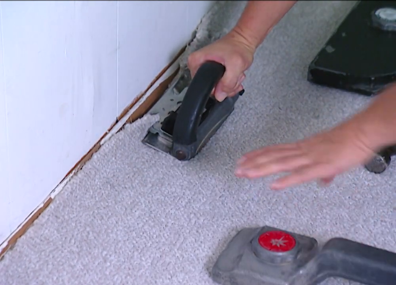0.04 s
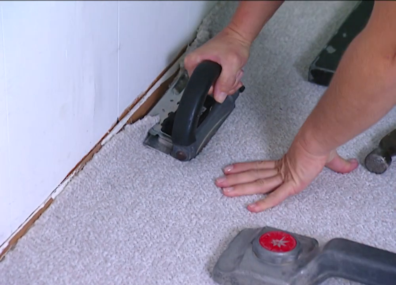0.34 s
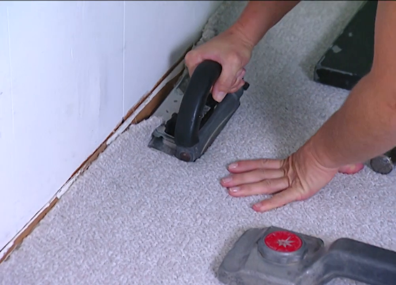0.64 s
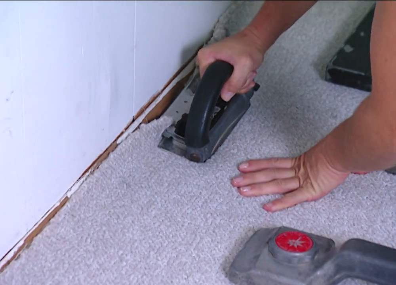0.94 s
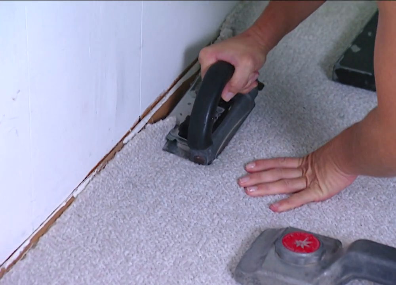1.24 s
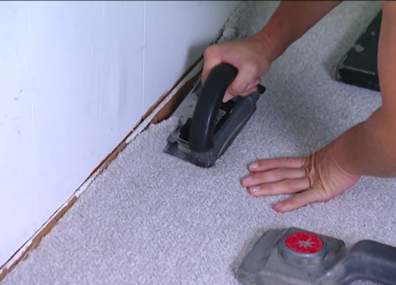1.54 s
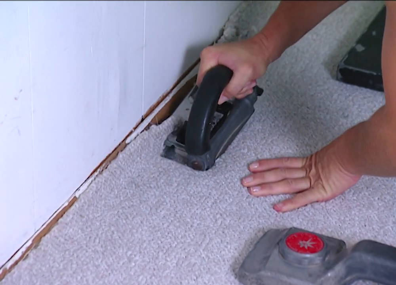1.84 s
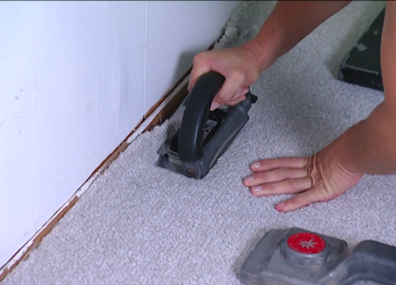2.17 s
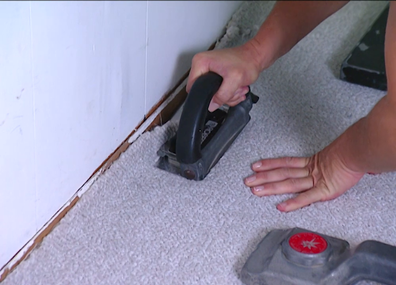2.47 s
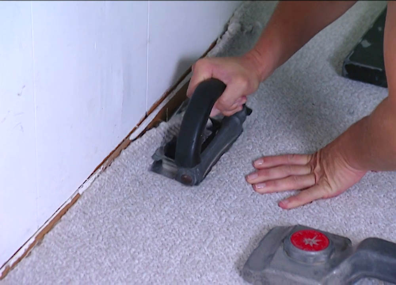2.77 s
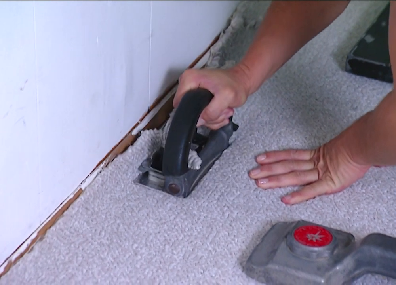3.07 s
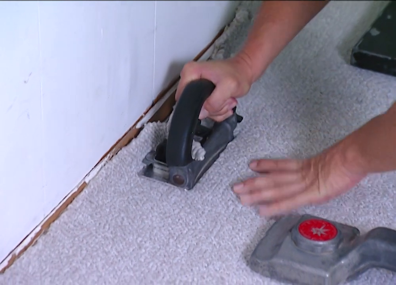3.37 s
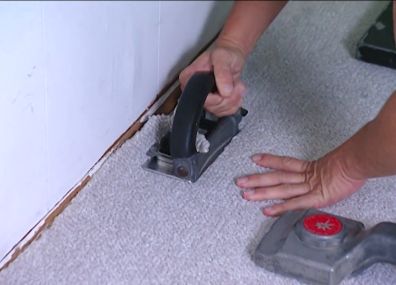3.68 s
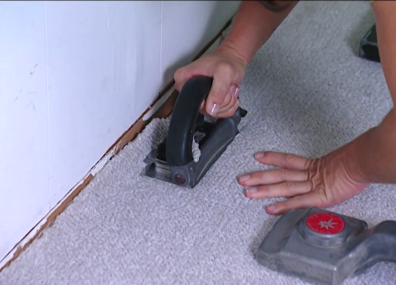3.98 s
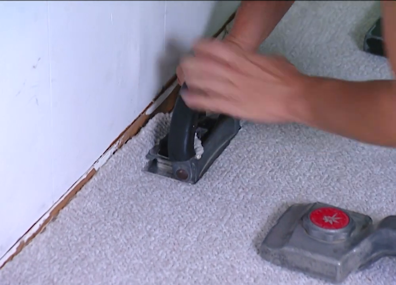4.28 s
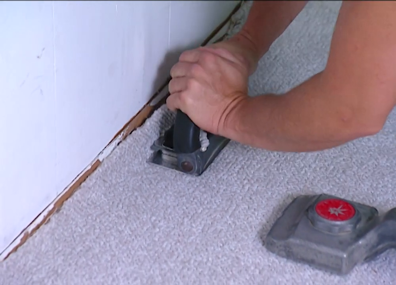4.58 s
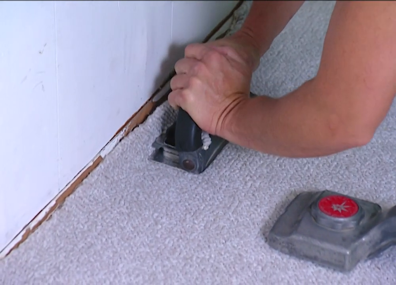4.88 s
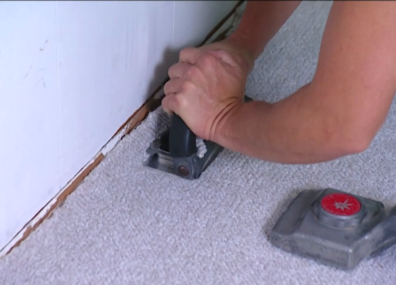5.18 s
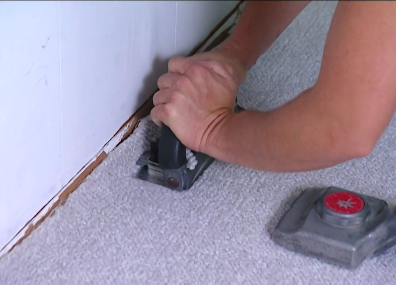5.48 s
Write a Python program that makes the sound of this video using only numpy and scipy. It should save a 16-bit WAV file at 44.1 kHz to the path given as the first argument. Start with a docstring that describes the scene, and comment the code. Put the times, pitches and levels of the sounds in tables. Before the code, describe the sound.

A hand trimmer cuts through carpet in uneven strokes, with dry tearing, crackling threads and a few light knocks in a quiet room.

```python
"""Trimming carpet along a baseboard

A hand trimmer is pushed in uneven strokes through carpet in a quiet room. Its blade tears a mass of
fine fibres and snaps the stiff threads of the backing one by one; each fracture is an impulse that
excites the tool's resonances. Between strokes hand and sole rub over the pile, and the tool knocks
as the grip changes."""
import sys
import numpy as np
from scipy import signal
from scipy.fft import rfft, irfft
from scipy.io import wavfile
from scipy.ndimage import uniform_filter1d, map_coordinates

SR = 44100
rng = np.random.default_rng(int(sys.argv[2]) if len(sys.argv) > 2 else 0)


def digitize_waveform(pressure):
    """Quantize a signal to 16-bit integers and store it at the path in sys.argv[1].

    Rows of a 2-D input are taken as channels; values are limited to [-1, 1].
    """
    field = np.atleast_2d(pressure).T
    bounded = np.clip(field, -1, 1)
    quanta = np.round(bounded * 32767).astype(np.int16)
    wavfile.write(sys.argv[1], SR, quanta)


N = 252252

# spectra of the room tone and of the pile's swish (frequency [Hz], relative density [dB])
ROOM_SPECTRUM = [(20, -16), (55, 6.5), (110, -3), (160, -6.5), (215, -2), (320, -20), (600, -15),
                 (1200, -25), (2500, -24), (5000, -26), (9000, -28), (16000, -33.5)]
PILE_SPECTRUM = [(100, -8), (220, -3), (350, 4), (700, 4), (1150, -3), (1800, -5.5), (3000, -7), (5500, -8),
                 (11000, -14), (16000, -17.5)]
# swell of a distant drone (time [s], level [dB])
DRONE_SWELL = [(0.5, -65), (0.7, -57), (1.25, -58), (1.45, -61.5)]
# bands of rasp, treble and body (lower edge [Hz], upper edge [Hz])
# a level below is that of the rasp; treble and body are relative to it
REGISTER_BANDS = [(1500, 4800), (4800, 16000), (70, 1400)]
# hand and sole brushing the pile
# (time at full speed [s], attack [s], hold [s], release [s], relative level [dB], treble [dB], body [dB])
RUB_GESTURES = [(0.0, .1, 0.23, 0.11, -60, -0.5, 5.5), (0.41, 0.1, 0.039, 0.16, -63.5, 3, 3),
                (0.652, 0.41, 0.034, 0.29, -53, -2.5, 3.5), (0.95, 0.084, .15, 0.69, -63, 3, 3),
                (3.175, .18, 0.027, 0.39, -57, 2, 2), (3.396, 0.31, 0.086, 0.17, -61, 2, -2),
                (3.683, 0.094, 0.014, .08, -55.5, 0, -0.5), (4.067, 0.063, 0.0091, 0.081, -52, 0.5, 0),
                (4.19, .1, .02, 0.18, -80.5, 16, -5), (4.362, 0.069, .004, 0.02, -66, 6, 2),
                (4.414, 0.011, 0.0058, 0.012, -70.5, 16.5, -6), (4.679, 0.043, .02, 0.36, -57.5, -1, 5)]
# blows of tool and hand (time [s], unfiltered peak [dB], most excited frequency [Hz], T60 factor [1])
BLOWS = [(0.385, -32, 350, 0.63), (3.0247, -27, 725, 0.47), (3.263, -38, 450, .9), (3.291, -30, 434, 0.72),
         (4.096, -40.5, 440, 1.4), (4.254, -37, 3020, 0.6), (4.352, -38, 252, 1.1),
         (4.517, -34, 1490, 0.99), (4.620, -45, 450, 1.2), (4.656, -22, 990, 2), (4.6598, -21, 171, 1.5),
         (4.667, -27, 1210, 0.69)]
# modes of the tool on the padded floor (frequency [Hz], gain [dB], T60 [s])
FLOOR_MODES = [(138.8, -7.5, 0.026), (206, -6, 0.026), (435, -7, 0.046), (545, -12, 0.06),
               (864, 6.5, 0.012), (1160, 0, 0.0044), (1570, -8, 0.008), (2200, 1.5, 0.012),
               (3180, 2, 0.012)]
# resonances of tool and blade in four successive grips (frequency [Hz], width [Hz], gain [dB])
GRIP_1 = [(194, 130, 4), (437, 78, 3.5), (730, 190, 6.5), (1062, 235, 4), (1980, 130, -1),
          (2390, 600, -3.5), (3094, 460, -1.5), (3900, 1200, -6.5), (6160, 810, 1.5), (8230, 710, 2),
          (9130, 1000, 2), (10600, 700, -14), (11500, 820, 2), (12700, 630, -1), (14700, 760, -0.5),
          (14800, 700, -10)]
GRIP_2 = [(98, 167, 3.5), (453.8, 150, 3.5), (760, 220, 5.5), (1140, 190, -0.5), (2022, 108, -3),
          (2530, 290, -1.5), (3250, 580, -1), (3950, 920, -0.5), (6300, 950, 3), (8350, 830, -15),
          (9040, 1340, 4.5), (10800, 980, -2.5), (11800, 690, 4.5), (12250, 1400, -1), (14200, 650, -4),
          (15300, 650, -3)]
GRIP_3 = [(150, 490, -4), (748, 250, 10), (1050, 130, 2), (1940, 220, 3.5), (2726, 590, 3.5),
          (3960, 860, 1), (5190, 600, 1), (6260, 610, -2.5), (7530, 500, -5), (8650, 450, 1.5),
          (10400, 390, -0.5), (11600, 470, -4), (13200, 600, -6), (14700, 900, -4)]
GRIP_4 = [(174, 230, -1), (500, 380, 4), (817, 117, 8.5), (965, 194, 1.5), (2000, 184, 3), (2518, 340, 3.5),
          (3135, 300, 5), (3750, 400, -7.5), (5080, 420, -1), (6120, 650, -6.5), (8020, 1000, -6.5),
          (8560, 500, -5.5), (10340, 480, -5), (11240, 640, -9), (12600, 900, -11), (14520, 900, -8.5)]
# changes of grip (time [s])
GRIP_CHANGES = [2.4, 3.4, 4.4]
# strokes during which the blade creeps on between pushes (start [s], end [s], level [dB])
CREEP_STROKES = [(0.961, 1.725, -70), (1.719, 2.953, -68), (3.757, 4.024, -67.5), (4.85, 5.798, -75)]
# pushes that drive the blade (time at full force [s], attack [s], hold [s], level [dB], treble [dB])
BLADE_PUSHES = [(1.003, .04, 0.063, -55.5, -0.5), (1.244, .1, 0.012, -66, -4),
                (1.484, 0.069, 0.024, -44.5, 3.5), (1.57, 0.043, 0.023, -57, 4.5),
                (1.658, 0.064, 0.024, -47, -1.5), (1.972, 0.045, .073, -37.5, -1.5),
                (2.108, .04, 0.0089, -45.5, -2), (2.282, 0.24, 0.012, -61, -1),
                (2.488, 0.0068, 0.02, -46, -5.5), (2.607, 0.058, 0.051, -46.5, -12),
                (2.745, 0.23, .125, -33.5, 0), (3.786, 0.035, 0.039, -46.5, 7.5),
                (3.951, 0.039, 0.037, -53.5, 8), (4.874, 0.028, 0.036, -46.5, 9),
                (5.044, 0.085, 0.12, -50.5, 9.5), (5.212, 0.13, .19, -46.5, 8),
                (5.459, 0.11, 0.0081, -50.5, 7), (5.556, 0.054, 0.012, -50, 6),
                (5.629, 0.068, 0.079, -47.5, 7.5)]
# loudest snaps of backing threads, and sharp ticks of the tool as it knocks
# (time [s], level [dB], treble [dB])
SNAPS_AND_TICKS = [(0.3849, -44.5, -3.5), (0.6466, -48.5, 7.5), (0.7132, -53, 17), (0.724, -44.5, 2),
                   (0.9922, -50.5, 13.5), (1.0475, -41, 7.5), (1.1264, -45, 8), (1.1316, -42, 9),
                   (1.2113, -51, 11), (1.2233, -50.5, 9), (1.459, -36.5, 0), (1.4782, -43, 6),
                   (1.6417, -45.5, 7), (1.6465, -46, 10), (1.789, -49, 12.5), (1.961, -34.5, -1),
                   (1.9645, -35.5, -3), (2.0208, -33.5, 8), (2.038, -44, 14.5), (2.0593, -49, 5),
                   (2.0634, -40.5, 14), (2.0905, -41.5, 10), (2.1112, -48, 11), (2.115, -41.5, 10),
                   (2.2867, -54, 16), (2.392, -59.5, 13), (2.4814, -43.5, 7), (2.536, -51.5, 20.5),
                   (2.5715, -52.5, 19), (2.609, -42, 9), (2.6457, -36.5, 4), (2.6581, -36.5, 10.5),
                   (2.7828, -31.5, 6), (2.7898, -41, 12), (2.8156, -35, 10), (2.8337, -43, 12),
                   (2.853, -46, 4), (2.8758, -47, 7), (2.896, -32, 5), (2.9087, -28.5, 0.5),
                   (2.9554, -62, 20.5), (3.0245, -40.5, 1.5), (3.476, -51, -1), (3.7698, -34, 2.5),
                   (3.7954, -41, 10.5), (3.8091, -31, 4), (3.829, -36.5, 6), (3.8346, -31, 4.5),
                   (3.9466, -36.5, 7.5), (3.9767, -39.5, 4.5), (3.9894, -42, 7), (4.0082, -45.5, 5),
                   (4.7502, -42.5, 8), (4.8709, -35.5, 1), (4.8753, -37, 8.5), (4.9025, -41.5, 10),
                   (4.9231, -35.5, 4), (4.9355, -37.5, 8.5), (4.9774, -42.5, 9.5), (5.0227, -41, 8.5),
                   (5.063, -35, 6), (5.1121, -34.5, 7.5), (5.1173, -36.5, 6.5), (5.1472, -35, 3.5),
                   (5.1757, -31, 1.5), (5.2035, -33, 3), (5.2325, -32, 3), (5.2778, -34.5, 2),
                   (5.287, -33.5, -3.5), (5.3079, -31, 5), (5.3442, -29, 0.5), (5.3648, -42, 7),
                   (5.3804, -31, 0.5), (5.3897, -32, -4), (5.412, -37, 7), (5.4243, -38.5, -2),
                   (5.4445, -37, 2.5), (5.4918, -41, 5.5), (5.5038, -37.5, 3.5), (5.5376, -32.5, -2),
                   (5.568, -30, -1), (5.5985, -35, -1), (5.6333, -27, -4.5), (5.6448, -26.5, -16),
                   (5.6626, -31, -1.5), (5.6863, -29, -9), (5.7066, -33, -5)]
# body of the snaps and ticks, which thins out late in the last stroke (time [s], body [dB])
SNAP_BODY_CURVE = [(0.38, 1), (0.7, -13), (1.45, -5.5), (2.0, -3), (2.6, 5.5), (2.9, -1.5), (3.8, -3),
                   (5.23, -0.5), (5.32, -9.5), (5.7, -10)]


def undb(db):
    """Amplitude ratio of a level: tenfold for every 20 dB."""
    return 10 ** (np.asarray(db) / 20)


def unit(x):
    """Normalisation to an rms of 1."""
    return x / np.sqrt(np.mean(x ** 2))


def butter(x, hz, kind, order=3):
    """Maximally flat (Butterworth) filtering, causal, along the last axis."""
    return signal.sosfilt(signal.butter(order, hz, kind, fs=SR, output="sos"), x)


def wander(rate_hz):
    """Random modulation: Gaussian values joined by straight lines, with a spread near 1."""
    return 1.2 * np.interp(np.arange(N) / SR * rate_hz, np.arange(8192), rng.standard_normal(8192))


def shaped_noise(spectrum):
    """Spectral shaping: white noise weighted by (frequency [Hz], level [dB]) points."""
    hz, db = np.transpose(spectrum)
    f = np.maximum(np.fft.rfftfreq(N, 1 / SR), 1)
    gain = undb(np.interp(np.log(f), np.log(hz), db))
    return unit(irfft(rfft(rng.standard_normal(N)) * gain, N))


def registers(x):
    """Band splitting into the blade's rasp, the fibres' treble and the tool's body, each of energy 1."""
    rasp, treble, body = REGISTER_BANDS
    parts = butter(x, rasp, "band"), -butter(x, treble, "band"), butter(x, body, "band", order=4)
    return [p / np.sqrt(np.sum(p ** 2, axis=-1, keepdims=True)) for p in parts]


def voicing(db, treble_db, body_db):
    """Spectral balance: a column of gains for rasp, treble and body."""
    return undb(db + np.array([[0], [treble_db], [body_db]]))


def modulate(texture, gains):
    """Amplitude modulation of a steady texture, with one moving gain to each register."""
    return np.sqrt(N) * sum(gain * part for gain, part in zip(gains, registers(texture)))


def swell(s, attack_s, hold_s, release_s):
    """Exponential envelope: up 20 dB per attack_s, held from time s, down 20 dB per release_s."""
    t = np.arange(N) / SR
    decades_down = np.maximum(s - t, 0) / attack_s + np.maximum(t - s - hold_s, 0) / release_s
    return 10 ** -np.minimum(decades_down, 10)


def room_tone(noise_db=-53, hum_db=-64, hum_hz=59.2, drone_hz=106.2):
    """Superposition of the house's rumble and hiss, mains hum and a distant drone that swells once."""
    t = np.arange(N) / SR
    hum = undb(hum_db) * np.sin(2 * np.pi * hum_hz * t)
    drone_db = np.interp(t, *np.transpose(DRONE_SWELL)) + 2 * wander(4.3)
    drone = undb(drone_db) * np.sin(2 * np.pi * drone_hz * t)
    rumble_and_hiss = undb(noise_db - 0.4 * wander(3.48)) * shaped_noise(ROOM_SPECTRUM)
    return rumble_and_hiss + np.sqrt(2) * (hum + drone)


def reverberation(x, t60_s=.17, low_db=-21, high_db=-24, size=11025):
    """Absorption by the carpet leaves only a faint, short tail of diffuse reflections."""
    t = np.arange(size) / SR
    echoes = rng.standard_normal(size) * (t > .004) * np.exp(-np.log(1000) * t / t60_s)
    low = undb(low_db) * unit(butter(echoes, 1580, "low"))
    high = undb(high_db) * unit(butter(echoes, 540, "high"))
    return signal.fftconvolve(x, (low + high) / np.sqrt(size))[:N]


def rubbing(flicker_db=2.16, gain_db=-1):
    """Friction noise: soft tufts brush past skin and the tool's sole in a smooth, dull swish."""
    power = sum((voicing(db, treble_db, body_db) * swell(s, attack_s, hold_s, release_s)) ** 2
                for s, attack_s, hold_s, release_s, db, treble_db, body_db in RUB_GESTURES)
    swish = shaped_noise(PILE_SPECTRUM) * undb(flicker_db * wander(210))
    return undb(gain_db) * modulate(swish, np.sqrt(power))


def knocking(size=8192):
    """Modal excitation: a blow on the padded floor drives most the damped modes near its own pitch."""
    t = np.arange(size) / SR
    out = np.zeros(N + size)
    for s, peak_db, centre_hz, t60_factor in BLOWS:
        blow = np.zeros(size)
        for hz, db, t60 in FLOOR_MODES:
            excitation = undb(db) / (1 + (2 * np.log2(hz / centre_hz)) ** 2)
            decay = np.exp(-np.log(1000) * t / (t60 * t60_factor))
            blow += excitation * np.sin(2 * np.pi * hz * t) * decay
        start = int(s * SR)
        out[start:start + size] += undb(peak_db) * blow / np.abs(blow).max()
    return butter(out[:N], 95, "high", order=2)  # a gentle high-pass keeps the knocks from booming below about 95 Hz


def resonate(x, resonances, max_q=24, size=1024):
    """Minimum-phase filtering by damped resonances, each kept broader than its frequency over max_q."""
    f = np.fft.rfftfreq(size, 1 / SR)
    power = sum(undb(db) ** 2 / (1 + (2 * (f - hz) / max(width, hz / max_q)) ** 2) ** 1.25
                for hz, width, db in resonances)
    cepstrum = irfft(np.log(power) / 2)
    cepstrum[1:size // 2] *= 2  # folding onto positive time gives minimum phase
    cepstrum[size // 2 + 1:] = 0
    response = irfft(np.exp(rfft(cepstrum))).reshape((1,) * (x.ndim - 1) + (-1,))
    return signal.fftconvolve(x, response, axes=-1)[..., :x.shape[-1]]


def tool_response(x, times):
    """Forced vibration: x drives the resonances of the tool as it is held at the given times."""
    responses = [unit(resonate(x, grip)) for grip in (GRIP_1, GRIP_2, GRIP_3, GRIP_4)]
    return np.choose(np.searchsorted(GRIP_CHANGES, times), responses)


def cutting_gains():
    """Incoherent addition: the blade's creep and pushes sum in power to give each register's gain."""
    t = np.arange(N) / SR
    creep = sum(undb(db) * (t > start) * (t < end) for start, end, db in CREEP_STROKES)
    creep = uniform_filter1d(creep, size=882)  # 20 ms ramps
    power = (voicing(0, treble_db=7.5, body_db=4.5) * creep) ** 2  # a thin sizzle
    for s, attack_s, hold_s, db, treble_db in BLADE_PUSHES:
        push = voicing(db, treble_db, body_db=1.44) * swell(s, attack_s, hold_s, release_s=0.06)
        power += push ** 2
    return np.sqrt(power)


def tearing(cut_gains, fibres_per_s=5000, spread_db=4):
    """Shot noise: fine fibres part in dense tiny clicks, bunched as the blade catches and slips."""
    t = np.arange(N) / SR
    parted = rng.random(N) < fibres_per_s / SR
    sizes = rng.choice([-1, 1], N) * undb(spread_db * np.clip(rng.standard_normal(N), -2, 2))
    catching = undb(2 * np.clip(wander(420), -2, 1.5))
    return modulate(tool_response(parted * sizes * catching, t), cut_gains)


def lesser_threads(cut_gains, firm_db=-45, firm_rate_hz=34, spread_db=2.5, slots=600):
    """Random point process of snaps (time [s], level [dB], treble [dB]), denser with harder tearing."""
    place, luck, strength = rng.random((slots, 3)).T
    slot_s = N / SR / slots
    times = (np.arange(slots) + place) * slot_s
    rasp_gain = cut_gains[0, (times * SR).astype(int)]
    force_db = 20 * np.log10(np.maximum(rasp_gain, 1e-12)) - firm_db  # 0 dB is a firm cut
    snapped = luck < slot_s * firm_rate_hz * undb(0.7 * force_db)
    db = -42.5 + 0.6 * force_db + spread_db * (2 * strength - 1)
    treble_db = 6 - 0.24 * force_db  # gentler tearing gives fainter, thinner snaps
    return np.column_stack([times, db, treble_db])[snapped]


def snapping(clicks, fray_s=0.0017, fray_gain=0.21, fray_spread_db=3, pitch_spread=.016, size=1024):
    """Impulse response: a breaking thread, or the sharp tick of a knock, rings the tool."""
    times, db, treble_db = clicks.T
    body_db = np.interp(times, *np.transpose(SNAP_BODY_CURVE))
    chance = rng.standard_normal((len(times), size + 2))
    n = np.arange(size)
    # a thread's last filaments follow its click; some hold on longer
    fray_time = fray_s * undb(fray_spread_db * np.clip(chance[:, -1:], -1.5, 1.5))
    breaks = fray_gain * chance[:, :size] * np.exp(-n / SR / fray_time)
    breaks[:, 0] += 1
    # each thread meets the blade at another spot, so it rings at a slightly different pitch
    pitches = 1 + pitch_spread * chance[:, size]
    rings = tool_response(breaks, times[:, None])
    detuned = np.array([map_coordinates(ring, [n * pitch]) for ring, pitch in zip(rings, pitches)])
    rasp, treble, body = registers(signal.lfilter([1, -0.18], 1, detuned))  # a taut thread's hard edge
    snaps = rasp + undb(treble_db)[:, None] * treble + undb(body_db)[:, None] * body
    rms_scale = np.sqrt(.003 * SR)  # a snap's level is its rasp's energy as an rms over 3 ms
    out = np.zeros(N + size)
    for start, gain, snap in zip((times * SR).astype(int), undb(db), snaps):
        out[start:start + size] += rms_scale * gain * snap
    return out[:N]


def scene():
    """Superposition of the work's direct sound, its reverberation and the room tone, in one channel."""
    background = room_tone()
    cut_gains = cutting_gains()
    direct = tearing(cut_gains) + rubbing() + knocking()
    direct += snapping(np.vstack([SNAPS_AND_TICKS, lesser_threads(cut_gains)]))
    return (direct + reverberation(direct) + background)[None]


def record(dry, cutoff_hz=15900):
    """Band limiting: a steep elliptic low-pass removes the highest treble."""
    return signal.sosfilt(signal.ellip(10, .2, 70, cutoff_hz, fs=SR, output="sos"), dry)


dry = scene()
out = record(dry)
digitize_waveform(out)
```